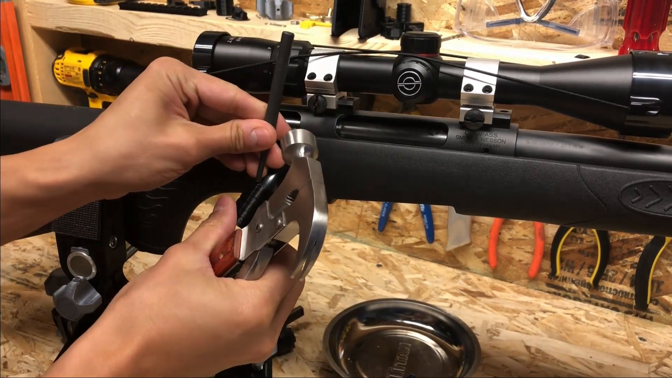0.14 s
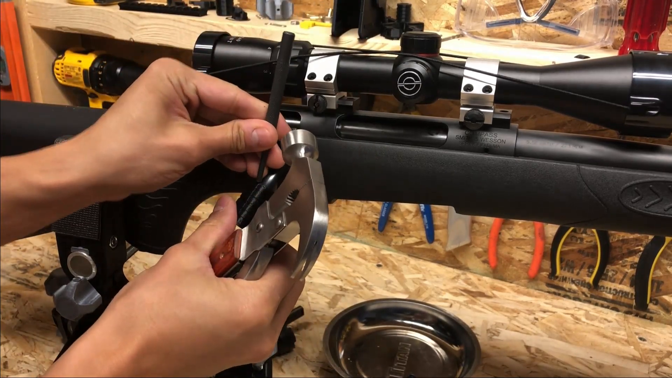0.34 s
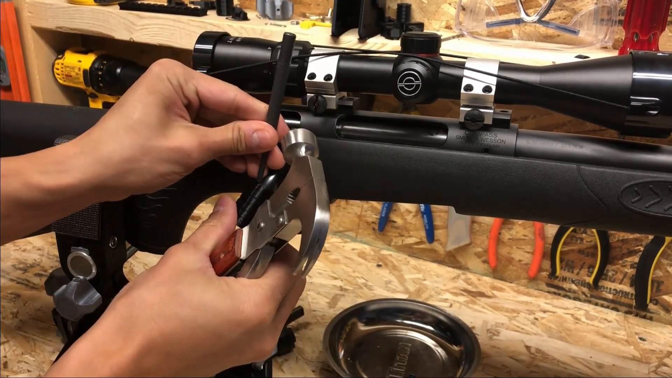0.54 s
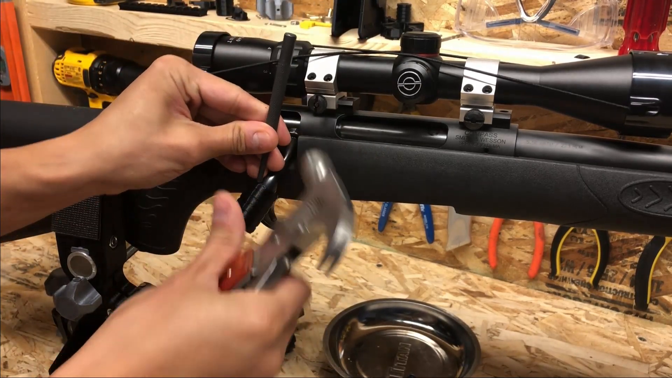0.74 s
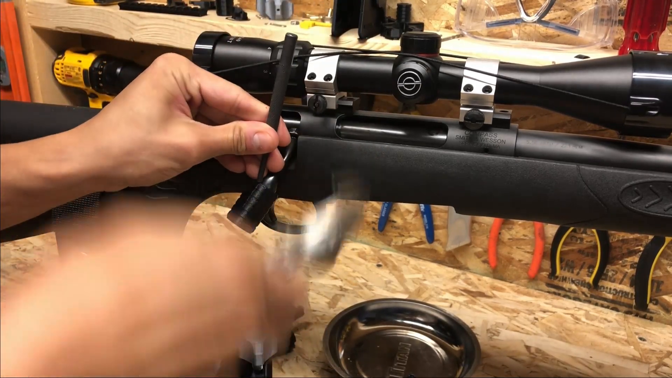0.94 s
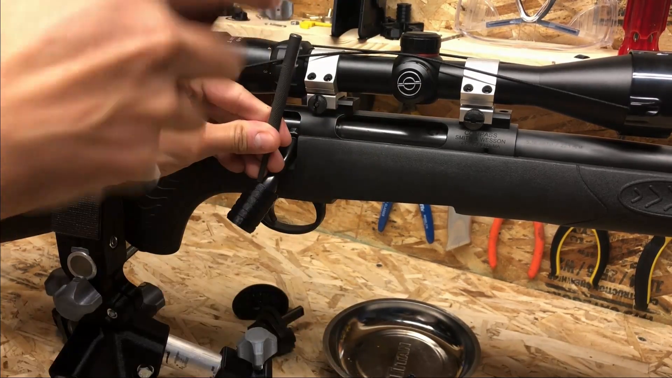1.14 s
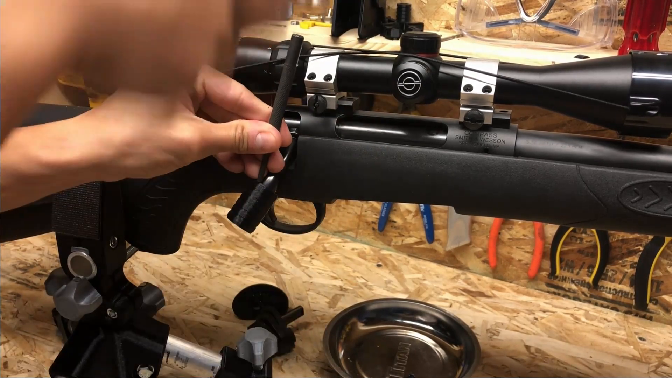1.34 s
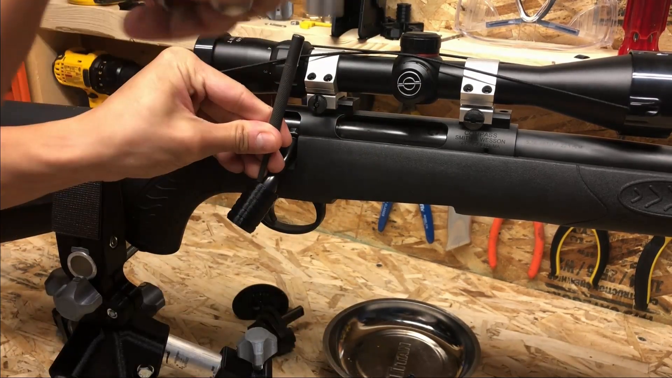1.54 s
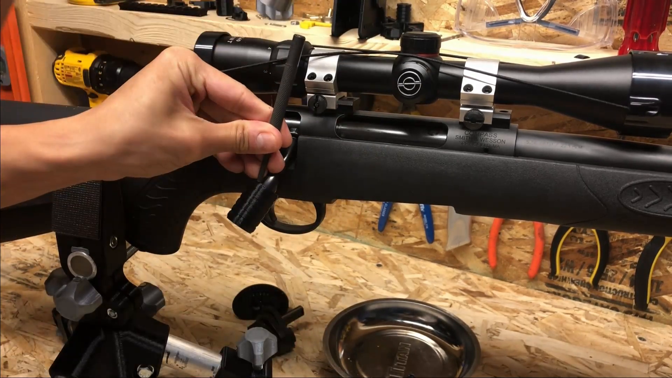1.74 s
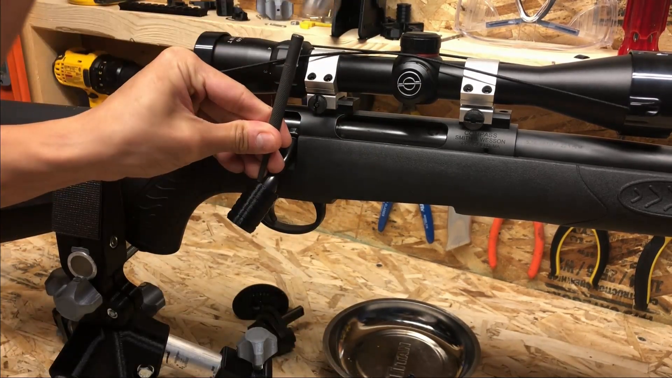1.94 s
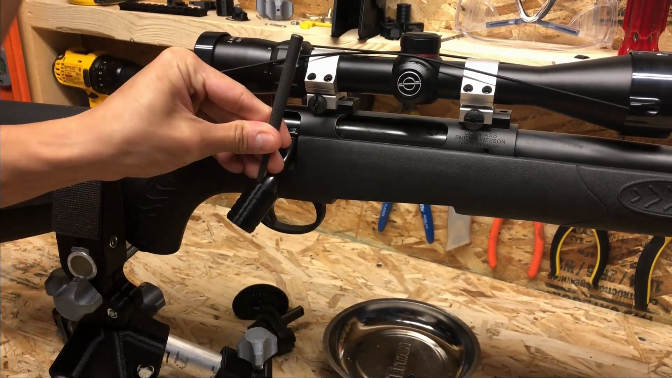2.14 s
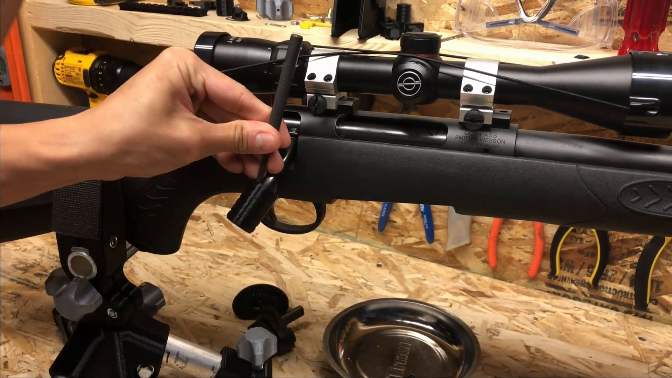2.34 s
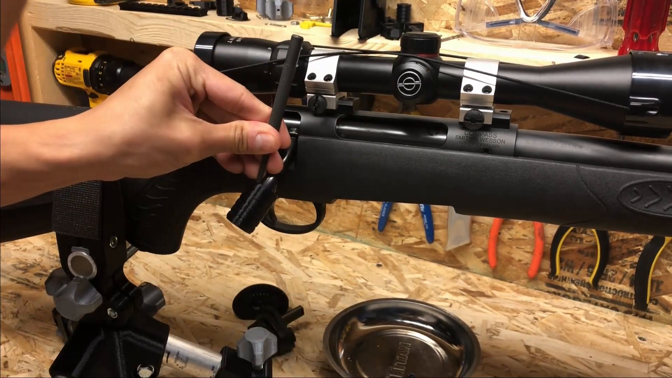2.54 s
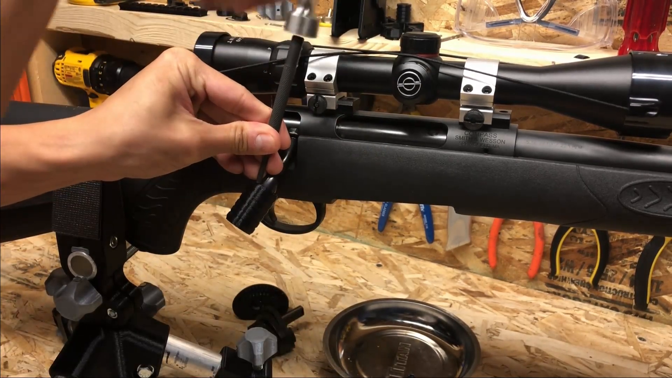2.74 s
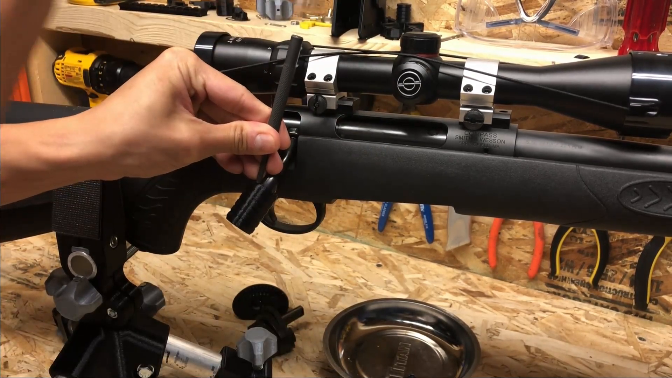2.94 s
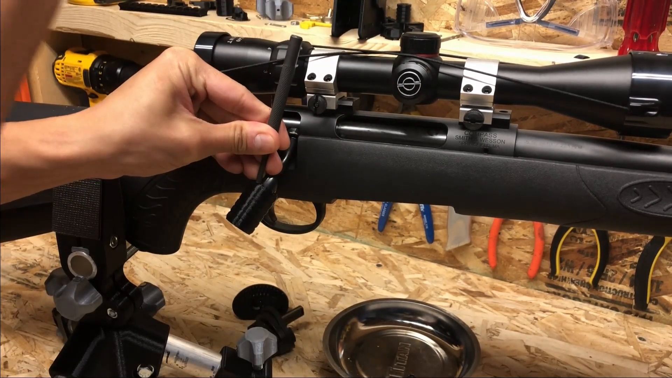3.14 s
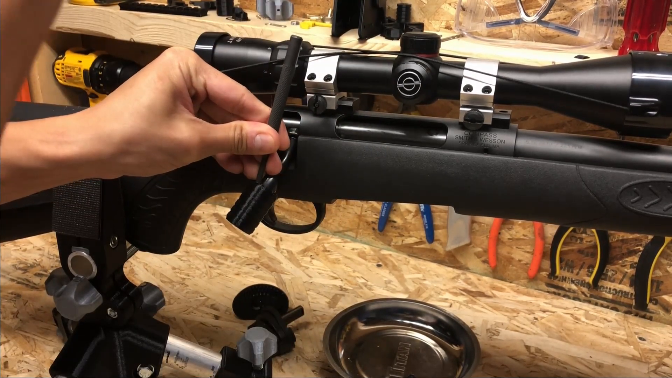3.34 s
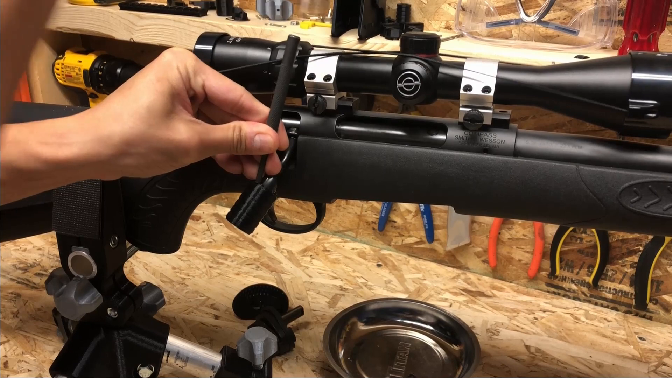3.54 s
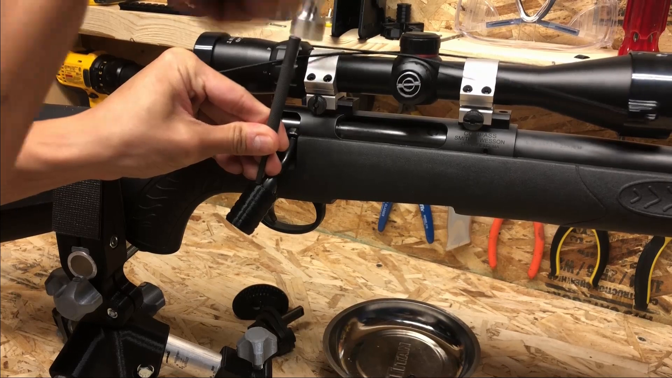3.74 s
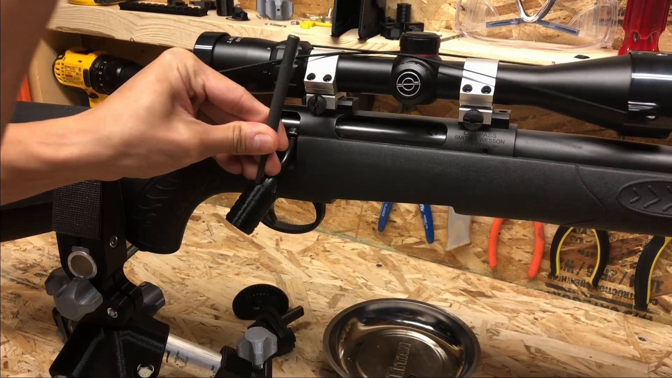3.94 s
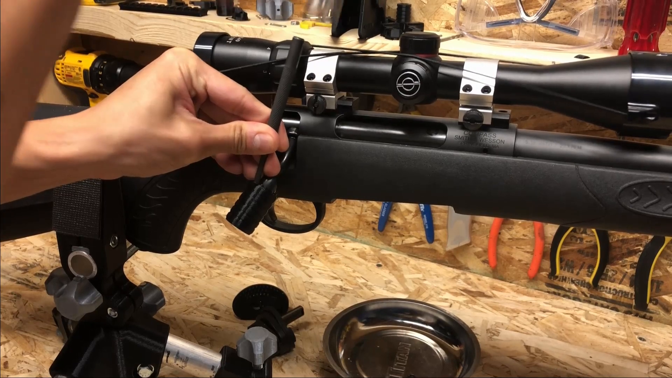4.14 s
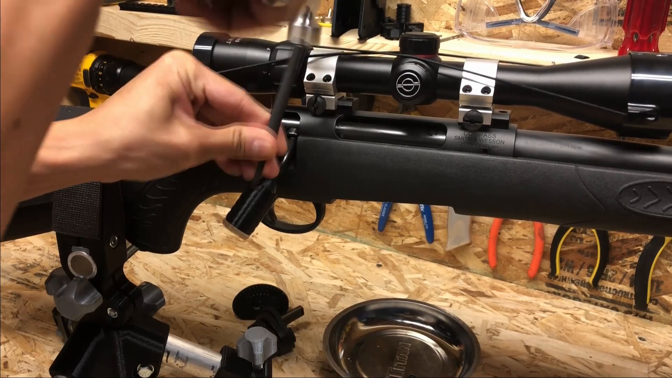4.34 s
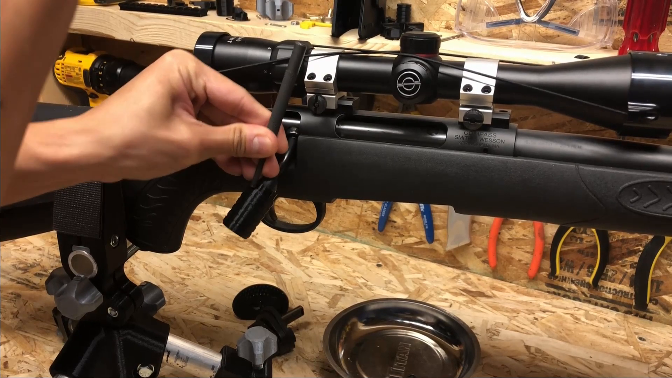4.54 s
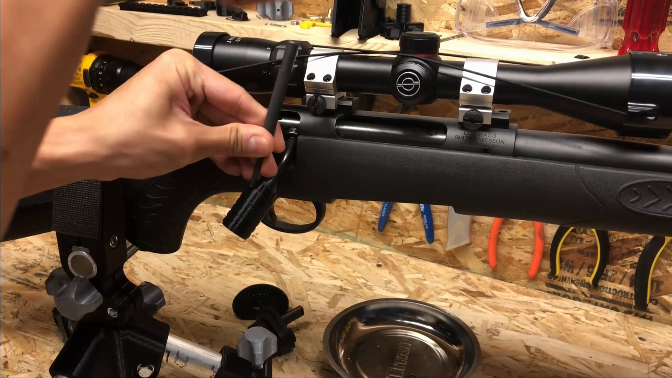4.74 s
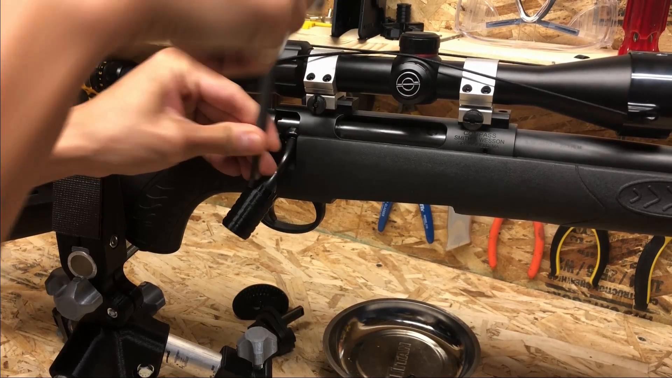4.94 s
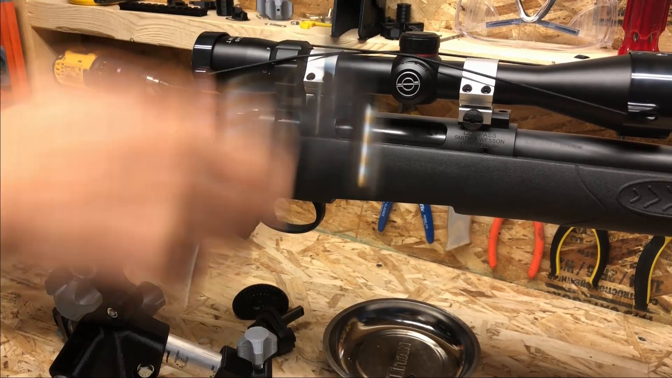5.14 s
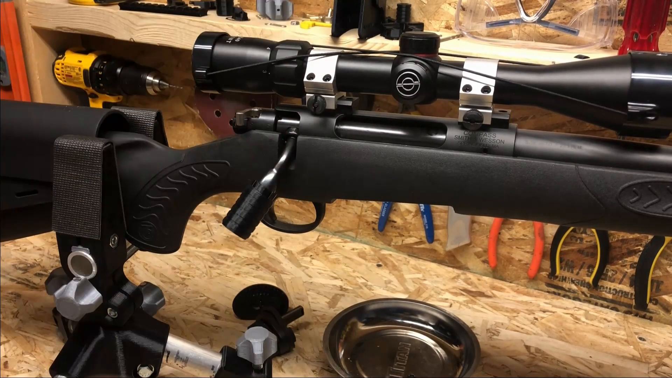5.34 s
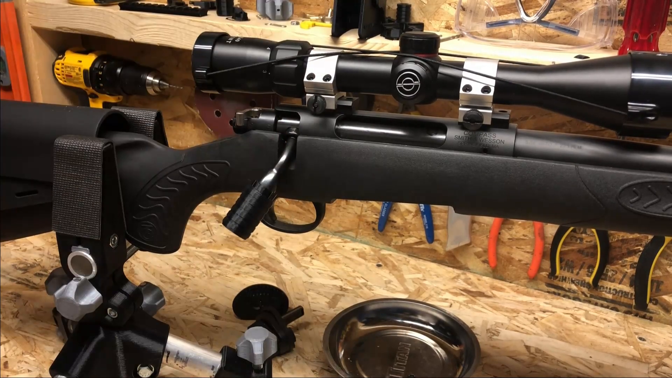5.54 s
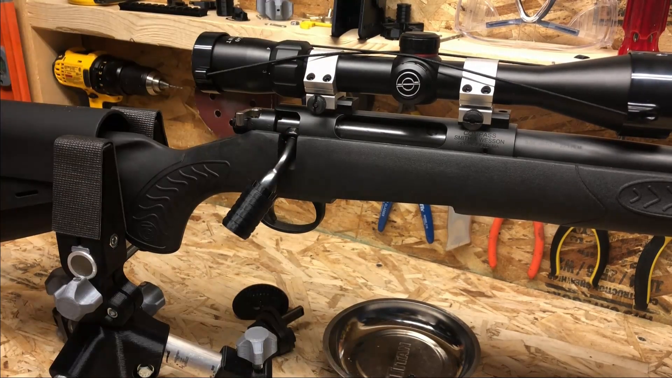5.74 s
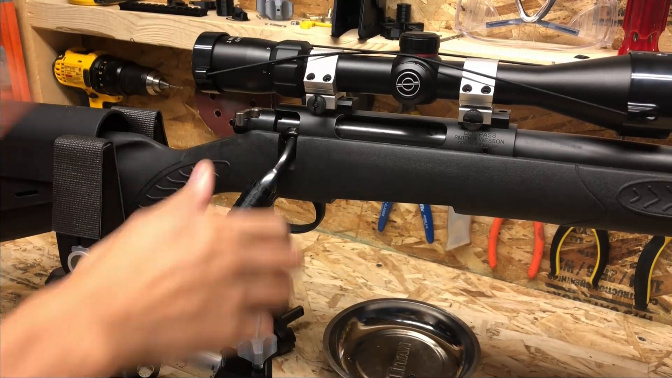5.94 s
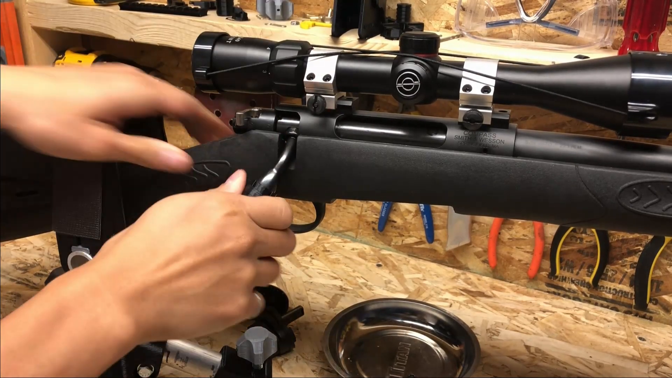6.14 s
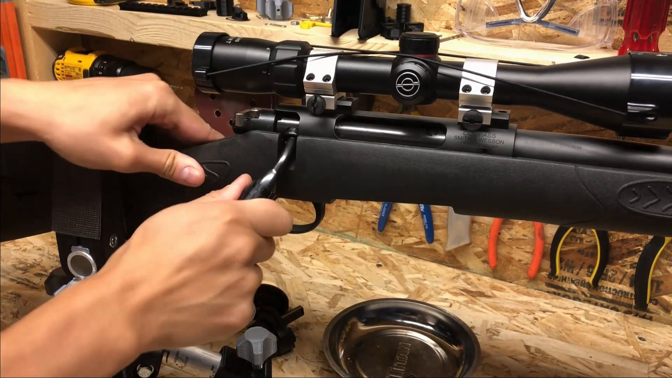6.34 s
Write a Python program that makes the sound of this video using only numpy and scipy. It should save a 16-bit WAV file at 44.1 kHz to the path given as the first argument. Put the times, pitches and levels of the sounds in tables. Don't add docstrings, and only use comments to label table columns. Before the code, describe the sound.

A small, dry workshop heard through one close microphone, with faint low rumble throughout. Almost nothing happens until 2.0 s, when a small hammer begins tapping a steel punch, about every quarter second. The first three taps, at 2.0, 2.25 and 2.5 s, are softer, the third brighter. From 2.75 s the blows are firm: a sharp steel snap, short damped ring, pin clack, and a low wooden thud with rattle from the clamped work. The hardest falls at 3.75 s, a dull hard one at 4.07 s, and the tenth at 4.35 s is bright with little thud. A faint clink at 4.5 s, a clearer one at 5.0, another faint at 5.26. Tools land on the bench in quick woody knocks at 5.55 to 5.7 s, loudest at 5.68, with a small rock at 5.8. Soft hand bumps come around 6.27 s, then a steel handle knocks and slides from 6.4 s to the end.

```python
import sys
import numpy as np
from scipy import signal
from scipy.fft import rfft, irfft, next_fast_len
from scipy.io import wavfile
from scipy.ndimage import uniform_filter1d

SR = 44100
rng = np.random.default_rng(int(sys.argv[2]) if len(sys.argv) > 2 else 0)


def wrap_up_sound(samples):
    columns = np.atleast_2d(samples).T
    tamed = np.clip(columns, -1, 1)
    steps = np.round(tamed * 32767).astype(np.int16)
    wavfile.write(sys.argv[1], SR, steps)


def attenuation_scalar(level_db):
    decades = np.asarray(level_db, float) / 20
    return 10 ** decades


N = 285864
SPAN = round(0.4 * SR)
T = np.arange(SPAN) / SR


def at_hz(points, hz):
    table_hz, value = np.array(points)[:, :2].T
    return np.interp(np.log(hz), np.log(table_hz), value)


def rms_one(x):
    return x / np.sqrt(np.mean(x ** 2) + 1e-20)


def peak_one(x):
    return x / (np.abs(x).max() + 1e-12)


def fade(t60_s):
    return attenuation_scalar(-60 * T / t60_s)


def rise(rise_s):
    return np.minimum(T / rise_s, 1)


def add(out, start_s, sound):
    i = round(start_s * SR)
    out[i:i + len(sound)] += sound[:N - i]


def above(x, hz):
    return signal.sosfilt(signal.butter(4, hz, "high", fs=SR, output="sos"), x)


def band(x, low_hz, high_hz):
    edges_hz = [low_hz, min(high_hz, 18000)]
    return signal.sosfilt(signal.butter(2, edges_hz, "band", fs=SR, output="sos"), x)


def ring(force, hz, t60_s):
    r, w = attenuation_scalar(-60 / (t60_s * SR)), 2 * np.pi * hz / SR
    return signal.lfilter([0, np.sin(w)], [1, -2 * r * np.cos(w), r * r], force + 1e-18)


def resonance(x, hz, width_hz):
    r, w = np.exp(-np.pi * width_hz / SR), 2 * np.pi * hz / SR
    return signal.lfilter([(1 - r * r) / 2, 0, (r * r - 1) / 2], [1, -2 * r * np.cos(w), r * r], x)


def steep_resonance(x, hz, width_hz):
    return resonance(resonance(x, hz, width_hz), hz, width_hz)


def contact(ms, at_s=0):
    push = np.clip(1 - (2000 * (T - at_s) / ms - 1) ** 2, 0, 1) ** 2
    return push / (push.sum() + 1e-9)


def coloured(spectrum, size):
    fast = next_fast_len(size)
    hz = np.maximum(np.fft.rfftfreq(fast, 1 / SR), 5)
    spectrum_of_noise = rfft(rng.standard_normal(fast)) * attenuation_scalar(at_hz(spectrum, hz))
    return rms_one(irfft(spectrum_of_noise, fast)[:size])


def follow(law, force_db, other_db):
    return law[0] + law[1] * force_db + law[2] * other_db


def stuck_s(start_s):
    return max(2.584 - start_s, 0)


# hz, level_db_per_hz
FLOOR_COLOUR = [(12, -32), (20, 1.5), (49, 0), (71, -13), (102, -9.5), (135, -22.5), (212, -21), (332, -28),
                (393, -37.5), (440, -30.5), (506, -31.5), (2970, -58), (15200, -63.5), (16500, -59.5)]


def rumble():
    lumps = rms_one(uniform_filter1d(rng.standard_normal(N), size=3000))
    return attenuation_scalar(-55.5 + 0.33 * lumps) * above(coloured(FLOOR_COLOUR, N), 37)


# hz, t60_s
ROOM_T60 = [(100, 0.34), (260, 0.25), (700, 0.084), (1840, 0.17), (4850, 0.16), (12800, 0.14)]


def workshop(x):
    edges_hz = 70 * 2 ** np.arange(0, 8.3, 0.5)
    white = rng.standard_normal((2, SPAN))
    answer = 0
    for k, (low_hz, high_hz) in enumerate(zip(edges_hz, edges_hz[1:])):
        t60_s = at_hz(ROOM_T60, np.sqrt(low_hz * high_hz))
        answer = answer + band(white[k % 2], low_hz, high_hz) * fade(t60_s)
    answer = answer * np.clip((T - 0.002) / 0.011, 0, 1)
    return signal.oaconvolve(x, answer / np.sqrt(np.sum(answer ** 2)))[:N]


# start_s, level_db
SLIDE = [
    (6.373, -76),
    (6.411, -60.5),
    (6.417, -47),
    (6.46, -31.5),
    (6.48, -48),
]
# hz, level_db_per_hz
SLIDE_COLOUR = [(710, -9), (1200, 10.5), (1560, -7), (1730, 5.5), (1980, -11), (2300, -3.5), (3430, -8.5),
                (5410, -6.5), (8350, -14), (9510, -15.5), (10900, -33), (16000, -63)]


def slide():
    start_s, level_db = np.transpose(SLIDE)
    grit = attenuation_scalar(3.3 * rms_one(uniform_filter1d(rng.standard_normal(SPAN), size=60)))
    envelope_db = np.interp(N / SR - T[::-1], start_s, level_db, left=-120)
    out = np.zeros(N)
    out[-SPAN:] = attenuation_scalar(envelope_db - 1) * rms_one(coloured(SLIDE_COLOUR, SPAN) * grit)
    return out


# start_s, peak_db, kind
KNOCKS = [(1.630, -73, "creak"), (4.521, -67, "creak"), (5.5475, -10.5, "punch"), (5.554, -15, "punch"),
          (5.649, -16, "heel"), (5.6533, -17, "heel"), (5.67, -46, "heel"), (5.6809, -6.5, "head"),
          (5.685, -11, "head"), (5.708, -28.5, "head"), (5.804, -18.5, "rock"), (6.111, -72.5, "creak"),
          (6.255, -41.5, "hand"), (6.277, -25, "hand"), (6.295, -43, "hand"), (6.31, -39.5, "hand"),
          (6.329, -72, "creak"), (6.402, -36, "hand"), (6.417, -19.5, "handle"), (6.433, -20, "handle"),
          (6.446, -22.5, "handle"), (6.461, -30, "handle")]
CONTACTS = {"creak": (-4, -8, -32, -12), "punch": (1.48, -31, -11.5, -30.5),
            "heel": (1.1, -17.5, -7.5, -30.5), "head": (1.11, -32.5, -16.5, -18),
            "rock": (0.97, -63, -19, -54), "hand": (1.87, -65, -21.5, -65),
            "handle": (1.1, -13.5, -50, -23.5)}
# mode_hz, level_db, t60_s
BENCH_TOP = [(346, -6, 0.14), (377.3, -3, 0.05), (489, -6, 0.033), (577, -2, 0.043), (689.6, -3, 0.081),
             (870, -18, 0.15), (910, -1.5, 0.026), (1220, -10.5, 0.12), (1290, -29.5, 0.19),
             (1637, -17.5, 0.18), (1929, -32.5, .08), (2150, -33.5, .08)]
# hz, level_db_per_hz
ROD_COLOUR = [(1500, -14.5), (3500, 2.5), (6300, -9.5), (7100, -16.5), (8300, -2.5), (11300, -34.5),
              (13200, -13.5), (16000, -25.5)]
# hz, level_db_per_hz
TICK_COLOUR = [(1760, -57), (3000, -23.5), (4220, -13.5), (4800, -4), (6530, -13), (8930, -4),
               (14500, -20.5), (15900, -2.5), (16500, -66.5)]


def knocks():
    out = np.zeros(N)
    colours = {"punch": ROD_COLOUR, "handle": SLIDE_COLOUR}
    for start_s, peak_db, kind in KNOCKS:
        contact_ms, tick_db, boom_db, crack_db = CONTACTS[kind]
        noise = rng.standard_normal(SPAN)
        push = contact(np.clip(contact_ms, 0.15, 3))
        force = push + attenuation_scalar(-28.5) * signal.lfilter(push[:150], [1], noise * fade(0.15))

        shift = 1 + 0.04 * rng.standard_normal()
        luck = rng.standard_normal(len(BENCH_TOP))
        wood = sum(attenuation_scalar(db + 2 * z) * ring(force, hz * shift, 0.5 * t60_s)
                   for (hz, db, t60_s), z in zip(BENCH_TOP, luck))
        boom = ring(contact(1.1), 192, 0.067) - attenuation_scalar(-6.5) * ring(contact(2.5), 144.2, 0.12)
        crack = band(band(noise[::-1] * rise(0.0019) * fade(0.081), 880, 2700), 1100, 2300)
        tick = coloured(colours.get(kind, TICK_COLOUR), SPAN) * rise(0.0028) * fade(0.085)

        knock = peak_one(above(wood, 366)) + attenuation_scalar(boom_db + 4.5) * above(boom, 100)
        knock += attenuation_scalar(crack_db + 5.5) * peak_one(crack) + attenuation_scalar(tick_db - 4.5) * tick
        add(out, start_s + 0.00061, attenuation_scalar(peak_db - 1.0) * knock)
    return out


# start_s, peak_db
CLINKS = [
    (4.4827, -37.5),
    (4.9992, -21.5),
    (5.2598, -35.5),
]
# hz, width_hz, level_db
PUNCH_GRIPPED = [(7600, 500, -16.5), (9000, 420, -15), (10600, 1300, -9), (13000, 900, 3.5),
                 (15100, 1100, -2)]
# hz, width_hz, level_db
PUNCH_AT_TIP = [(2950, 71, -23.5), (4170, 150, -13.5), (5234, 650, 5.5), (6720, 280, -1.5), (7770, 300, -3),
                (9350, 434, 6), (10700, 600, 0), (12330, 210, -6), (13800, 460, 4), (14600, 470, -13),
                (14920, 300, 3.5)]
# hz, width_hz, level_db
PUNCH_AT_MIDDLE = [(3620, 90, -14), (5030, 200, 0), (5800, 120, -12), (6460, 130, -11), (7450, 300, -5),
                   (8770, 250, -3), (9400, 350, -1), (12240, 250, -7), (12950, 220, -7), (13900, 160, -10),
                   (15100, 400, -9)]


def clinks():
    out = np.zeros(N)
    holds = (PUNCH_GRIPPED, PUNCH_AT_TIP, PUNCH_AT_MIDDLE)
    grazes_s, lead_ins_db = (0.004, 0.012, 0.03), (-50, -38, -30)
    for (start_s, peak_db), bands, graze_s, lead_in_db in zip(CLINKS, holds, grazes_s, lead_ins_db):
        after_s = np.maximum(T - 0.04, 0)
        graze = np.minimum(after_s / graze_s / 0.01, 1) * attenuation_scalar(-60 * after_s / graze_s)
        lead_in = attenuation_scalar(lead_in_db) * rise(0.042) * (after_s == 0)
        force = rng.standard_normal(SPAN) * (graze + lead_in)
        steel = 0
        for hz, width_hz, db in bands:
            low_hz, high_hz = hz - 0.9 * width_hz, hz + 0.9 * width_hz
            steel = steel + attenuation_scalar(db) * peak_one(band(band(force, low_hz, high_hz), low_hz, high_hz))
        add(out, start_s - 0.04, attenuation_scalar(peak_db - 4.0) * peak_one(steel))
    return out


# start_s, force_db, bench_share_db, brightness_db, pin_hz
BLOWS = [
    (1.9957, -13, 2.2, -4.5, 3330),
    (2.2398, -9.5, 3, -13.5, 3130),
    (2.4777, -7, 2.4, 3.5, 2944),
    (2.7429, 0, 1, 3.5, 2900),
    (2.9846, -1.03, 2.5, -0.5, 3240),
    (3.2327, -0.7, 2, 0.5, 2880),
    (3.481, 1.5, 2, 1.5, 2890),
    (3.7543, 4, 0.5, -2.5, 2144),
    (4.0677, 2, 1.16, -3.5, 3540),
    (4.352, 0.5, -13, 4.5, 2500),
]
CLACK_LAW = (-25, -0.6, -0.091)


def pin():
    out = np.zeros(N)
    for start_s, force_db, share_db, _, pin_hz in BLOWS:
        clack_db = follow(CLACK_LAW, force_db, share_db) - 36 * stuck_s(start_s)
        envelope = rise(0.00033) * (fade(0.046) + attenuation_scalar(-7.5) * fade(0.14))
        force = rng.standard_normal(SPAN) * envelope
        upper = peak_one(resonance(force, pin_hz, 380) + attenuation_scalar(-14.0) * band(force, 2100, 2700))
        lower = peak_one(steep_resonance(force, 1374, 200))
        add(out, start_s, attenuation_scalar(clack_db - 3.5) * (upper + attenuation_scalar(-13.5 + 2.0) * lower))
    return out


# mode_hz, level_db, t60_s
BOARDS = [(115.76, -39.5, .1), (216.1, -6.5, 0.045), (256.1, -6, 0.043), (331.1, -14, 0.14)]
# mode_hz, level_db
CLAMP = [(335, -1.5), (404, -1.5), (460, -1), (565, -0.5), (660, -7.5), (730, -8.5), (830, -14), (921, -29),
         (2100, -24)]
SWAY_LAW, RATTLE_LAW, BOUNCE_LAW = (-19.5, 0.45, -0.03), (-25, 1.4, 1.05), (-47.5, 3.5, 0.94)


def bench():
    out = np.zeros(N)
    for blow_s, force_db, share_db, *_ in BLOWS:
        thud_s = blow_s + 0.0085
        board_db = -15 + force_db + share_db
        board_hz = np.interp(blow_s, (3.6, 2.95), (203.8, 178))
        sway_db = follow(SWAY_LAW, force_db, share_db) - 52 * stuck_s(blow_s)
        rattle_db = follow(RATTLE_LAW, force_db, share_db)
        bounce_db = follow(BOUNCE_LAW, force_db, share_db)

        force = attenuation_scalar(-9.5) * contact(3.12) - contact(3.23, 0.0085) - attenuation_scalar(-7.5) * contact(11.0, 0.022)
        boards = ring(force, board_hz, 0.1)
        for (hz, db, t60_s), z in zip(BOARDS, rng.standard_normal(len(BOARDS))):
            boards += attenuation_scalar(db + 3.7 * z) * ring(force, hz, 1.2 * t60_s)
        boards += attenuation_scalar(-4.0 - 1.5 * (board_db + 22)) * ring(force, 155, 0.21)
        sway = ring(contact(10.5, 0.0004), 54, 0.14)

        noise = rng.standard_normal(SPAN)
        chatter = noise * (rise(0.015) * fade(0.14) + attenuation_scalar(-4.5) * fade(0.014))
        work = sum(attenuation_scalar(db) * steep_resonance(chatter, hz, 0.22 * hz) for hz, db in CLAMP)
        bounce = band(band(noise[::-1] * rise(0.012) * fade(0.18), 150, 600), 160, 750)

        thud = attenuation_scalar(board_db) * peak_one(above(boards, 180)) + attenuation_scalar(sway_db - 5.5) * peak_one(above(sway, 31))
        add(out, thud_s - 0.009, thud)
        add(out, blow_s, attenuation_scalar(rattle_db) * peak_one(above(work, 240)))
        add(out, thud_s + 0.077, attenuation_scalar(bounce_db) * peak_one(bounce))
    return out


# low_hz, high_hz
STEEL = [
    (4500, 8180),
    (8200, 11200),
    (11500, 19000),
]
# hz, width_hz, level_db, t60_s
HEAD = [(5418, 1700, -24.5, 0.18), (10530, 500, -18, 0.18)]
SNAP_LAW, PING_LAW, TOP_RING_LAW = (-3, 0.067, 0.76), (-19, 0.13, -0.6), (-24.5, 0.45, 0.4)
LOW_RING_LAW = (-24, 0.8, 0.55)


def hammer():
    out = np.zeros(N)
    for start_s, force_db, share_db, bright_db, _ in BLOWS:
        snap_noise, punch_noise, head_noise = rng.standard_normal((3, SPAN))
        snap_db = follow(SNAP_LAW, force_db, bright_db)
        ping_db = follow(PING_LAW, force_db, bright_db)
        high_db = -19 + force_db
        rings_db = (follow(LOW_RING_LAW, force_db, share_db), high_db,
                    follow(TOP_RING_LAW, force_db, bright_db))

        snap = peak_one(above(snap_noise * rise(0.000073) * fade(0.012), 6300))
        ping = peak_one(band(head_noise * rise(0.0004) * fade(0.014), 9000, 10600))
        tail_s = 0.11 * (1 - 0.0422 * share_db)
        force = punch_noise * rise(0.00058) * (fade(0.006) + attenuation_scalar(-12) * fade(tail_s))
        rings = sum(attenuation_scalar(db + 7.0) * peak_one(band(force, *edges_hz)) for db, edges_hz in zip(rings_db, STEEL))
        head = sum(attenuation_scalar(db) * steep_resonance(head_noise * fade(t60_s), hz, width_hz)
                   for hz, width_hz, db, t60_s in HEAD)
        blow = attenuation_scalar(snap_db - 7.0) * snap + attenuation_scalar(ping_db) * ping + rings + attenuation_scalar(high_db + 13.5) * head
        add(out, start_s, blow)
    return out


def scene():
    steel = hammer() + pin() + clinks() + slide()
    wood = bench() + knocks()
    room = workshop(attenuation_scalar(-12.5) * steel + attenuation_scalar(-12) * above(wood, 240))
    return (steel + wood + room + rumble())[None]


def smear(x, db, start_s, end_s):
    ahead_s = np.arange(2000)[::-1] / SR
    spread = rng.standard_normal(len(ahead_s)) * np.clip((start_s - ahead_s) / 0.005, 0, 1) * (ahead_s > end_s)
    return attenuation_scalar(db) * signal.oaconvolve(x, spread / np.sqrt(len(ahead_s)))[len(ahead_s) - 1:]


# hz, width_hz, level_db
MICROPHONE = [(5260, 1600, 7), (9530, 2400, 3.5), (15700, 730, 10.5)]


def low_pass(x):
    return signal.sosfilt(signal.butter(12, 17130, fs=SR, output="sos"), x)


def record(dry):
    x = dry[0]
    for hz, width_hz, db in MICROPHONE:
        x = x + (attenuation_scalar(db) - 1) * resonance(x, hz, width_hz)
    treble = above(x, 2400)
    attack = uniform_filter1d(treble ** 2, size=200) > 6 * uniform_filter1d(treble ** 2, size=2600)
    attack = uniform_filter1d(attack * 1.0, size=60)
    treble_grain = above(treble * attack * rng.standard_normal(N), 1500)
    x = x + smear(treble_grain, -44, 0.045, 0.012) + smear(band(x, 100, 1500), -35, 0.04, 0.002)
    cutoff_hz = 16200
    low = signal.sosfiltfilt(signal.cheby2(10, 40, cutoff_hz, fs=SR, output="sos"), x)
    x = low + (x - low) * attack * attenuation_scalar(-9.5)
    x = signal.sosfilt(signal.cheby2(12, 60, cutoff_hz + 1000, fs=SR, output="sos"), x)
    return low_pass(x[None])


dry = scene()
out = record(dry)
wrap_up_sound(out)
```